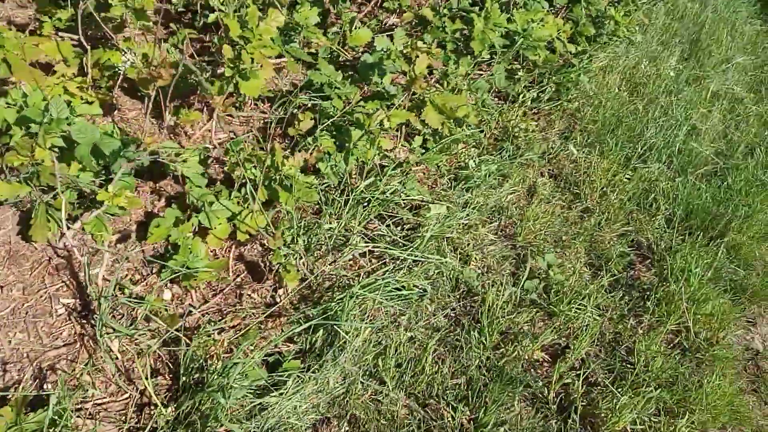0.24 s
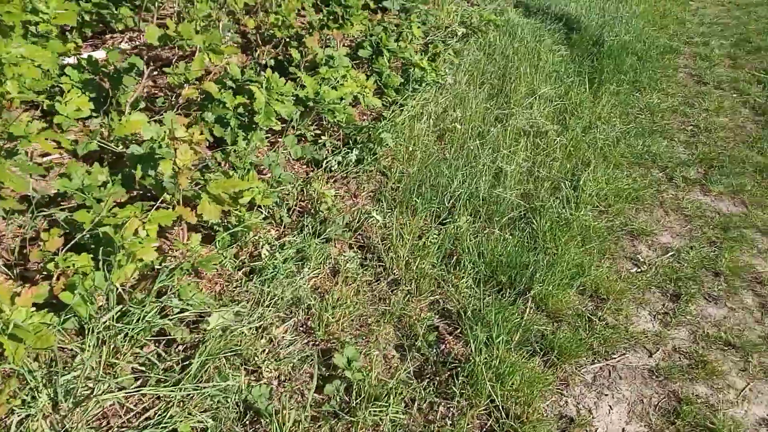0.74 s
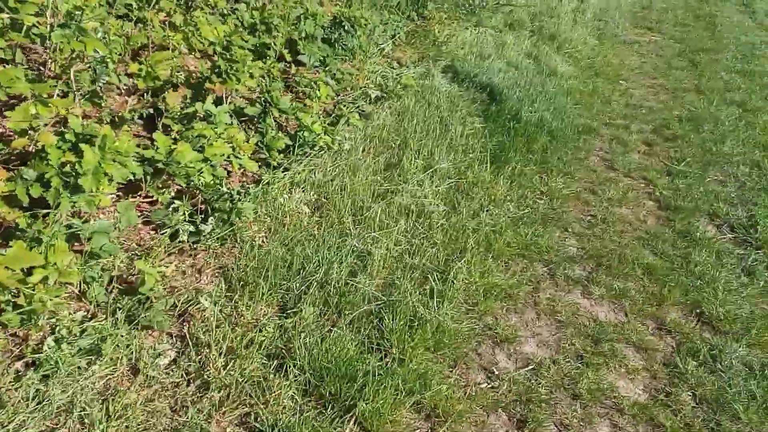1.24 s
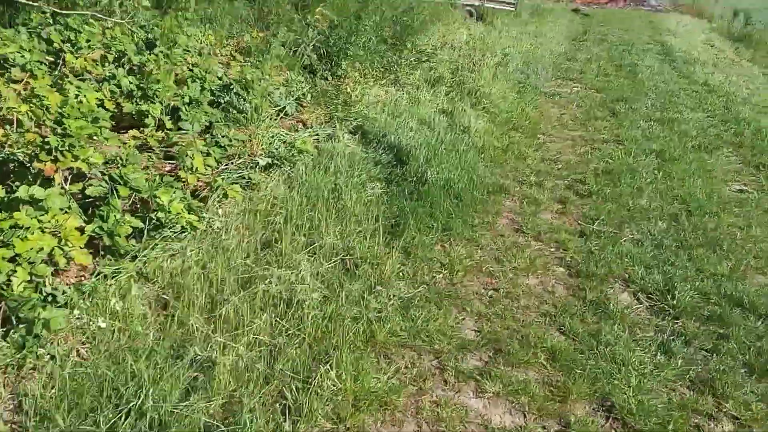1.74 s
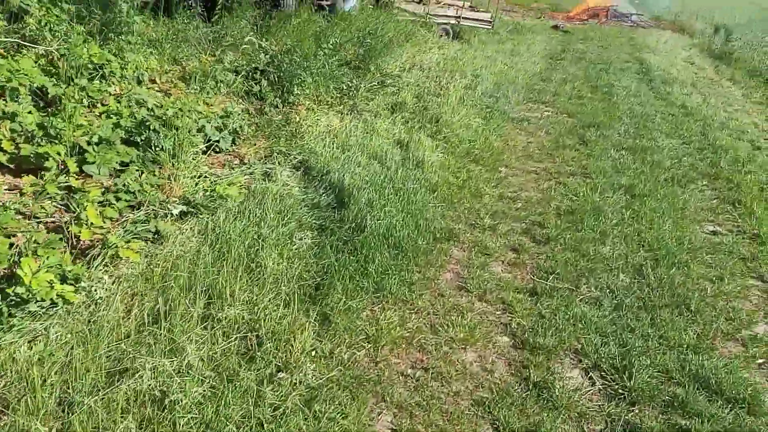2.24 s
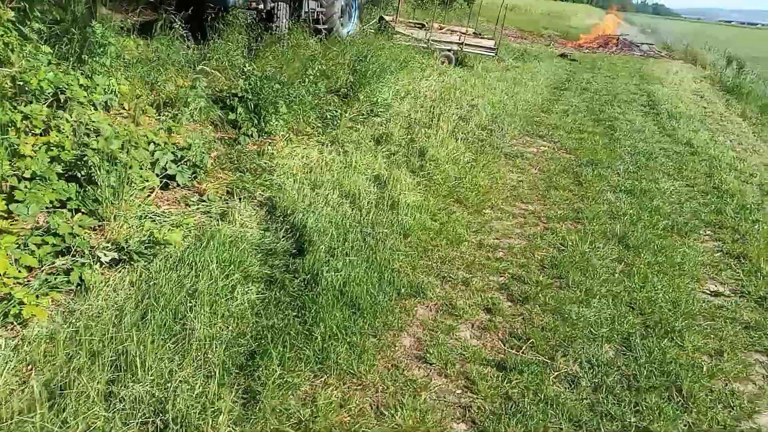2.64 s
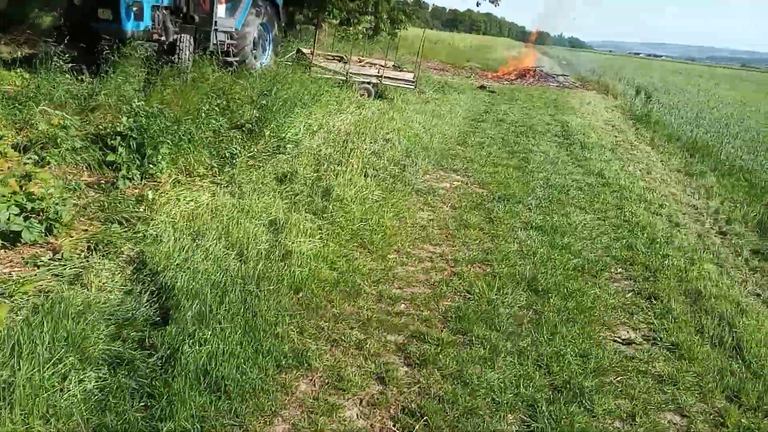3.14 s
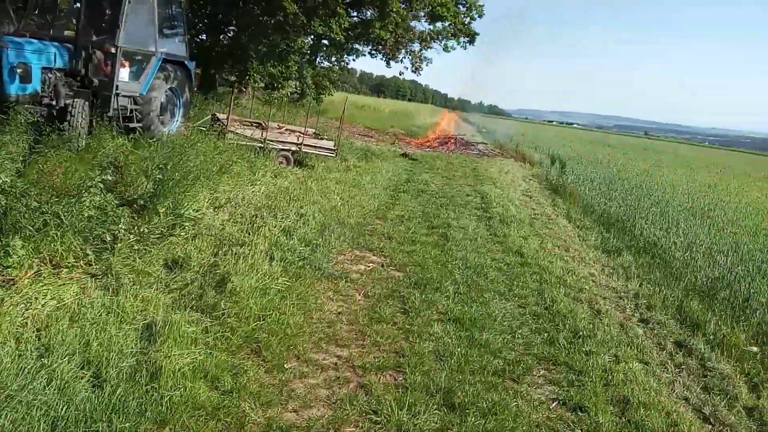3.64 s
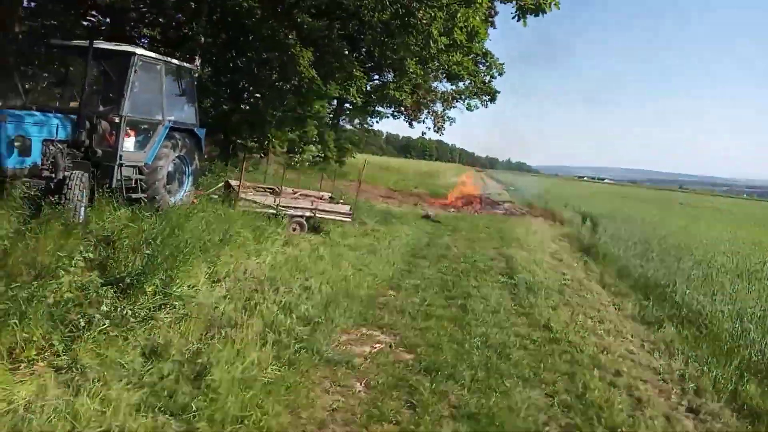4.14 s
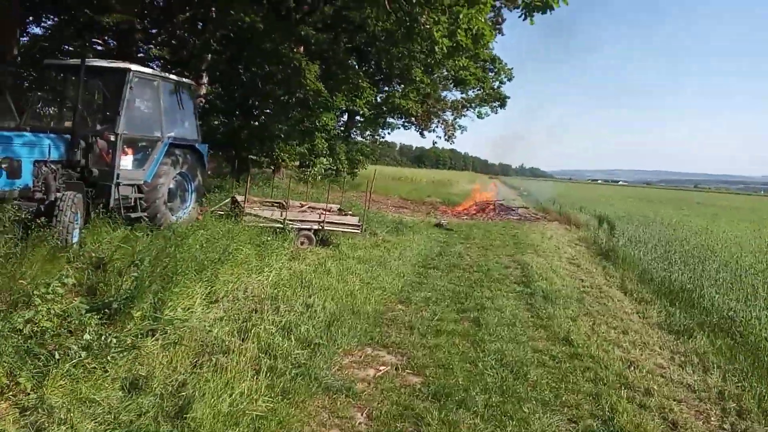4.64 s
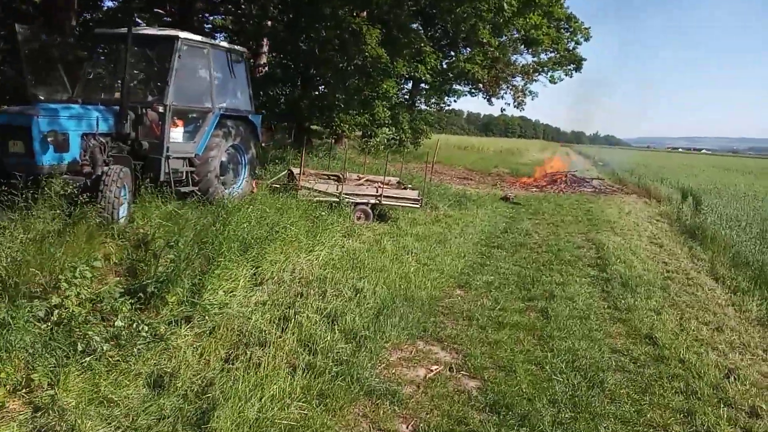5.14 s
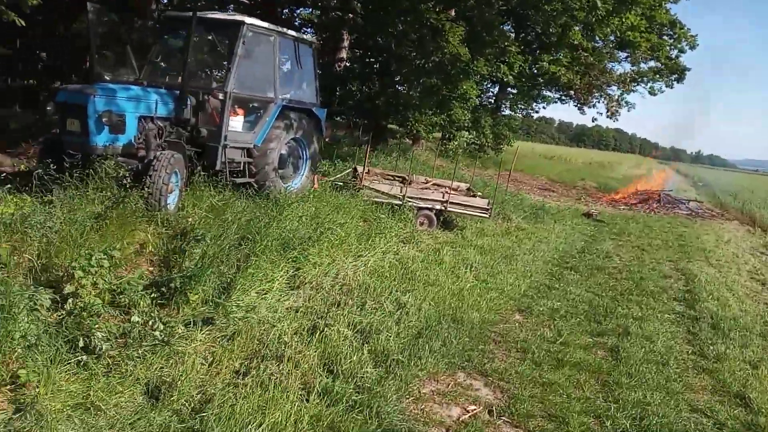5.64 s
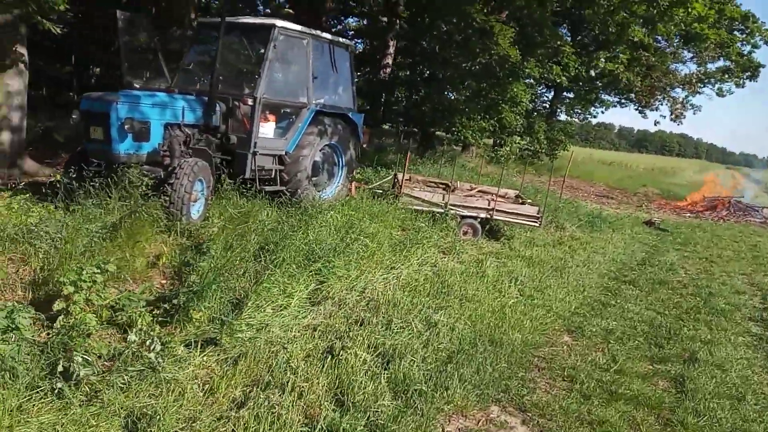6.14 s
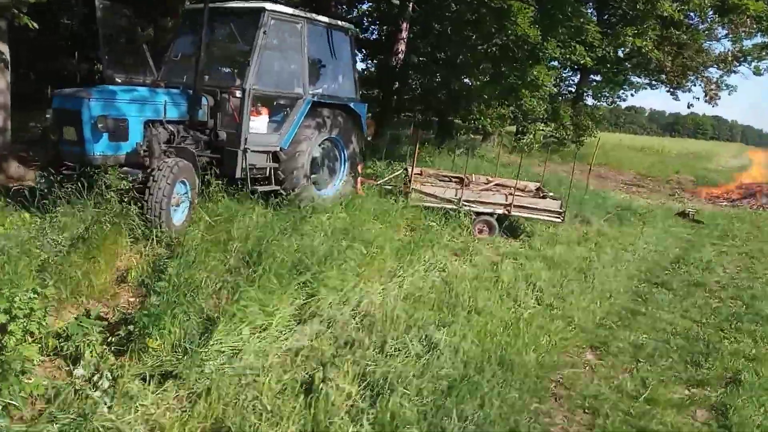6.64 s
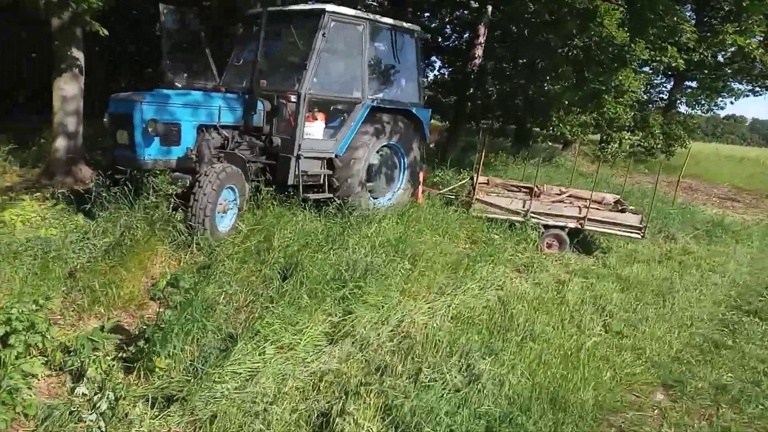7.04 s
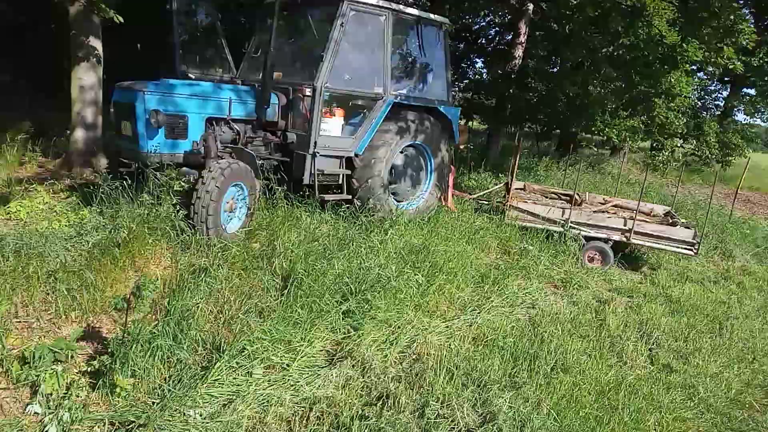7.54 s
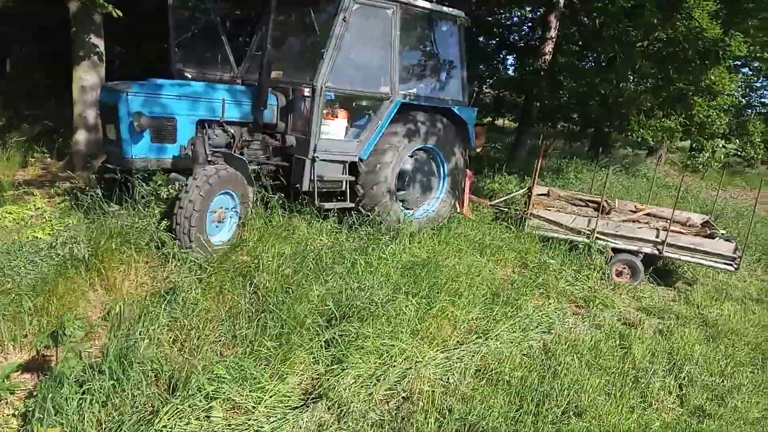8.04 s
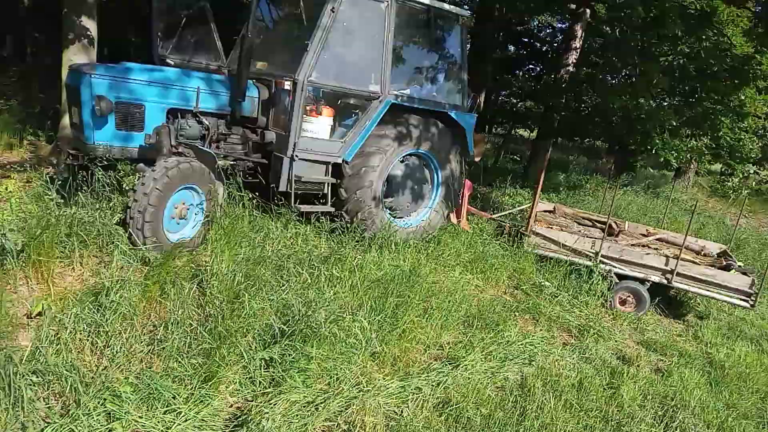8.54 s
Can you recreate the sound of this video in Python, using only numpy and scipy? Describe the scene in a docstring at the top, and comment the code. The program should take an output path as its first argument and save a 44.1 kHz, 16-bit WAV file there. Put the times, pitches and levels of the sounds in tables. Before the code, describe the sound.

A mono, close handheld pickup of a slow walk through long dry grass outdoors. From 0 s, brittle crackling and airy swishes surge every 0.2 to 0.4 s, uneven and overlapping, above a faint steady high hiss. Bright millisecond snaps scatter throughout, strong near 1.2 s. A very faint low hum lies between 0.4 and 1.6 s; distant falling bird whistles come near 1.1, 1.9 and 2.9 s, with a tiny high peep at 1.6 s. Small knocks touch the microphone at 2.7 and 2.9 s. The loudest woody crack hits at 4.3 s with a brief duller wash from trees; others follow at 5.4 and 6.4 s. Low wind puffs and soft thumps cluster around 4.7 to 5.2 s, with gusts until about 7.7 s. Swishing grows brighter and denser, with a strong sweep at 8 s and sharp snaps until the end at about 8.8 s.

```python
"""Walk through long dry grass

A slow walk through long grass at the edge of a field, towards a burning heap of brushwood.
Dense random clicks make the swish and crackle of blades; damped rings, clicks and noise bursts make dry snaps.
The sharpest cracks are noise with a slower noise echo from the trees. Shaped noise gives hiss, scuffs and wind.
Damped thumps are knocks and puffs on a small, peaky microphone; gliding tones are a far bird; a low tone hums."""
import sys
import numpy as np
from scipy import signal
from scipy.fft import rfft, irfft
from scipy.io import wavfile
from scipy.ndimage import uniform_filter1d

SR = 44100
rng = np.random.default_rng(int(sys.argv[2]) if len(sys.argv) > 2 else 0)


def unload_audio(sound):
    """Save the sound as a 16-bit wav file, at the path given as the first command line argument."""
    columns = np.transpose(np.atleast_2d(sound))
    # keep every value between -1 and 1, then stretch to whole-number steps
    steps = np.round(np.clip(columns, -1, 1) * 32767)
    wavfile.write(sys.argv[1], SR, steps.astype(np.int16))


N = 387198

# Levels in the event tables are nominal: trims in the functions and filters still act on them.
# A leg sweeps through the grass or a foot presses it down:
# crest_s, crackle_db, length_s, swish_re_crackle_db
LEG_SWEEPS = [(0.0, -52.5, 0.069, -7), (0.19, -50, 0.056, -12), (0.29, -54, 0.067, -21),
              (0.583, -58, .04, -21.5), (0.989, -51.5, .09, -13.5), (1.363, -56.5, 0.11, -31),
              (1.664, -56, 0.067, -21), (1.816, -55.5, 0.09, -20.5), (2.172, -51, 0.075, -6),
              (2.492, -49.5, 0.11, -7.5), (2.702, -55, 0.1, -15.5), (2.885, -54.5, .1, -10),
              (3.237, -56, 0.12, -14.5), (3.574, -57, 0.17, -4), (3.771, -54, .05, -10),
              (3.933, -51.5, .06, -7), (4.056, -50.5, 0.12, -13), (4.372, -50.5, 0.11, -9),
              (4.575, -58.5, 0.089, 1), (4.721, -53.5, 0.15, -10.5), (4.906, -51, 0.043, -18),
              (5.17, -51.5, 0.18, -6.5), (5.342, -50, 0.099, -2.5), (5.541, -53.5, .05, -19.5),
              (5.71, -55.5, .08, -7.5), (5.88, -53, 0.16, -3), (6.195, -51.5, 0.12, -10.5),
              (6.504, -50.5, 0.14, -11), (6.705, -54, 0.085, -3), (6.885, -52.5, 0.045, -3.5),
              (7.093, -54.5, 0.15, -15), (7.312, -49.5, 0.065, -9.5), (7.448, -54, 0.11, -18),
              (7.722, -54, 0.05, -19.5), (8.001, -47, 0.11, -6.5), (8.232, -50.5, 0.14, -3),
              (8.492, -57.5, .12, -9), (8.697, -49.5, 0.11, -10)]
SWEEP_RISE = 0.98  # build-up of a sweep, as a share of its length
# Grass brushing the legs between sweeps, a curve in time: time_s, crackle_db, swish_db
LEG_BRUSHING = [(0, -58.5, -81), (0.782, -70, -63), (1.099, -58.5, -70), (2.298, -59, -72.5),
                (3.379, -65, -69.5), (3.699, -59.5, -63.5), (4.601, -59, -59), (5.001, -64.5, -70),
                (5.199, -56.5, -64.5), (7.6, -57, -60), (8.1, -54, -59), (8.78, -53, -60)]
# Louder dry snaps, from the burning brushwood or underfoot: start_s, peak_db, pitch_hz, treble_re_peak_db
DRY_SNAPS = [(0.2503, -27.5, 6000, -21.5), (0.2578, -36.5, 6640, -20.5), (0.336, -33.5, 5900, -17),
             (0.4129, -24.5, 6370, -24), (0.5631, -30.5, 6600, -19), (0.6856, -27.5, 6800, -34),
             (0.7067, -39, 6310, -22), (0.9602, -33, 6700, -24), (1.079, -30.5, 6970, -21.5),
             (1.1604, -34, 6530, -29), (1.185, -22.5, 6200, -38), (1.2059, -19.5, 6520, -32.5),
             (1.3154, -32, 5500, -14), (1.495, -35, 6370, -29.5), (1.5766, -30, 5310, -14.5),
             (1.733, -28.5, 5950, -22), (1.8073, -23, 6200, -31.5), (1.836, -32, 5150, -27),
             (1.9674, -29, 5940, -20), (2.4883, -26.5, 5900, -21.5), (2.6103, -26, 6070, -21),
             (2.6798, -32, 6100, -22.5), (2.8136, -39.5, 6290, -17), (2.8958, -30, 6160, -26),
             (2.9213, -28, 6700, -34.5), (3.1462, -30, 6900, -29), (3.1584, -27, 6130, -29),
             (3.3977, -31.5, 6610, -39), (3.6469, -25, 6500, -22), (3.6725, -26.5, 6670, -33),
             (3.7123, -30.5, 6520, -36), (3.8681, -29, 6500, -25), (3.964, -21.5, 6520, -37.5),
             (4.02, -32.5, 6070, -26.5), (4.2187, -23.5, 6570, -31), (4.2941, -14.5, 6520, -24),
             (4.573, -28.5, 6500, -20.5), (4.7182, -32, 6820, -18), (4.7714, -28, 6680, -14.5),
             (4.8783, -27.5, 6470, -18), (5.0767, -26, 6500, -33.5), (5.3188, -27.5, 6370, -10),
             (5.33, -25, 6600, -29), (5.4104, -19, 6590, -20.5), (5.586, -29, 6460, -19.5),
             (5.6156, -18, 5860, -25), (5.661, -28, 6160, -18), (5.668, -33.5, 6730, -9),
             (5.6986, -33, 6360, -14), (5.717, -27, 6120, -18), (5.899, -23.5, 6580, -21.5),
             (6.11, -29, 6520, -35), (6.1433, -27.5, 6430, -22.5), (6.1939, -22, 7270, -27.5),
             (6.3723, -21, 7260, -15), (6.7109, -30.5, 7140, -17), (6.9167, -30.5, 5960, -15.5),
             (7.0551, -34.5, 6650, -10), (7.324, -27, 6820, -13.5), (7.5549, -31, 6570, -19),
             (7.67, -34, 6400, -13), (7.7136, -35.5, 6730, -11.5), (7.8577, -23.5, 6810, -20),
             (7.93, -27, 6400, -16), (8.0188, -23.5, 6540, -24), (8.1877, -26.5, 6710, -12),
             (8.252, -27.5, 7150, -16), (8.377, -23, 6540, -30.5), (8.527, -21, 6550, -10),
             (8.5805, -21.5, 6800, -12), (8.7138, -29, 5740, -5)]
# Thicker wood cracking, with an echo from the trees: start_s, report_db, echo_db
WOOD_CRACKS = [(0.413, -44, -48.5), (1.208, -44, -55.5), (1.808, -46, -54), (3.1456, -42, -46),
               (3.647, -49, -49), (3.949, -43, -55.5), (4.2935, -27, -33.5), (5.4113, -37, -58.5),
               (5.616, -55, -45), (5.9, -41, -44.5), (6.1946, -50.5, -51), (6.372, -32.5, -43.5),
               (6.854, -45, -45.5), (7.858, -39, -49.5), (8.235, -39, -57), (8.579, -41.5, -53.5)]
# Dull scuffs of shoes and clothing: crest_s, rms_db, centre_hz, width_octaves, length_s
SHOE_SCUFFS = [(0.225, -68.5, 286.5, 0.54, 0.047), (0.64, -61, 1510, 0.24, 0.016),
               (0.651, -56.5, 2830, 0.41, 0.0053), (0.848, -54, 1670, 0.26, 0.0058),
               (0.847, -48.5, 3410, 0.29, .005), (0.899, -64.5, 1430, 0.32, 0.067),
               (1.008, -59, 1230, .55, 0.017), (1.247, -71.5, 509, 0.55, 0.035),
               (1.726, -71.5, 850, 1.3, 0.046), (2.484, -74, 1395, 0.63, 0.086),
               (2.547, -66.5, 661, 0.55, 0.026), (2.705, -63.5, 510, 0.58, 0.043),
               (3.215, -68, 1436, .35, 0.1), (4.336, -68.5, 1058, 0.52, 0.041),
               (5.105, -67.5, 1780, 0.76, 0.033), (5.368, -66.5, 1026, 0.64, 0.026),
               (5.415, -49, 990, 0.73, 0.0048), (5.503, -68.5, 980, 1.3, 0.046),
               (6.198, -69, 1136, 0.39, .053), (6.429, -69.5, 1252, 0.93, 0.052),
               (7.71, -64, 265, 0.44, 0.025), (8.049, -69, 1610, 1.46, 0.14), (8.255, -68, 2070, 1, 0.15),
               (8.689, -42, 1063, 1.2, 0.003), (8.73, -60, 902, 1.65, 0.065)]
# Knocks of the hand and puffs of air on the microphone: crest_s, peak_db, pitch_hz, crispness (0-1)
MIC_KNOCKS = [(2.716, -39, 480, .4), (2.721, -31.5, 370, .45), (2.8615, -39, 440, .4),
              (2.866, -46, 460, .3), (4.960, -38, 240, 0), (4.976, -30, 115, 0), (4.988, -25, 160, 0),
              (5.073, -32, 130, 0), (5.1335, -32, 370, 0), (5.1365, -22.5, 205, 0), (5.160, -37, 140, 0)]
# Bird whistles: start_s, length_s, start_hz, end_hz, level_db
BIRD_WHISTLES = [(1.14, .31, 2780, 2450, -74), (1.61, .08, 9250, 9150, -62.5), (1.94, .28, 2850, 2620, -73),
                 (2.87, .25, 2780, 2440, -71)]
# Gusts on the microphone: crest_s, level_db, length_s
WIND_GUSTS = [(0.0, -53.5, 0.083), (0.22, -50.5, 0.12), (0.8, -73.5, 0.31), (1.71, -66.5, 0.041),
              (1.85, -76, 0.14), (3.16, -66, 0.048), (3.49, -67, 0.13), (4.0, -66, .05),
              (4.17, -65.5, 0.059), (4.26, -56.5, 0.019), (4.67, -52, 0.079), (4.83, -44, 0.021),
              (4.91, -46, 0.065), (4.98, -39, 0.056), (5.12, -45, 0.059), (5.3, -50.5, 0.12),
              (5.49, -50, 0.037), (5.65, -57.5, 0.026), (5.81, -54.5, 0.066), (5.99, -42.5, 0.04),
              (6.27, -55.5, 0.091), (6.5, -45, 0.083), (6.68, -45.5, .03), (6.83, -57.5, 0.11),
              (7.35, -65, 0.13), (7.51, -47.5, 0.035), (7.68, -52, 0.16), (7.94, -63.5, 0.14),
              (8.2, -73.5, 0.055)]
BREEZE_DB, GUST_RISE = -82, 0.85  # wind between gusts; build-up of a gust, as a share of its length
# Stretches of a brief low hum: start_s, end_s, level_db
HUM_STRETCHES = [(.38, 1.176, -62), (1.23, 1.614, -64.5)]
HUM_FADE_S = 0.051
HISS_DB = -61.5

# Relative spectra, only their shape matters: frequency_hz, density_db (per Hz)
# Stalks crackling as they bend
CRACKLE_SPECTRUM = [(300, -37.5), (900, -42), (1400, -11.5), (2100, -28), (3000, -8.5), (3800, -14.5),
                    (4500, -5), (5600, -4), (6800, 0), (8000, -13), (10000, -9), (12000, -18.5),
                    (16000, -25)]
# Blades sliding over each other, also used for the bright noise burst of a snap
SWISH_SPECTRUM = [(500, -42.5), (2500, -42), (5000, -9), (8000, 0), (9700, 1.5), (10700, -3), (11800, 2),
                  (13500, -3), (16000, -12.5)]
# The click of a snap and its short noise tail
CLICK_SPECTRUM = [(300, -29), (900, -46), (1500, -21.5), (2200, -27), (3000, -12.5), (4200, -2), (6000, 3),
                  (8000, -8), (10000, -1.5), (16000, -42.5)]
# The sharp report of a crack
REPORT_SPECTRUM = [(200, -57), (400, 1), (700, -30), (1100, -22), (1500, -10), (2100, -10), (3200, -4.5),
                   (4500, 6.5), (6200, 1.5), (8000, -8), (11000, -1.5), (16000, -9)]
# Its wash returned by the trees
ECHO_SPECTRUM = [(300, -28), (900, -17), (1400, -19), (2100, -15), (3000, -14), (3800, -12), (4600, -9),
                 (6200, 0), (8000, -7), (11000, -13), (16000, -25)]
# The high background hiss
HISS_SPECTRUM = [(60, -17), (200, -10), (500, -15.5), (1000, -22), (2300, -26.5), (3000, -18.5),
                 (3800, -12), (4700, -2.5), (6500, -2.5), (8000, -17), (10500, -28.5), (13000, -44),
                 (16000, -22.5)]
# Wind on the microphone
GUST_SPECTRUM = [(20, -30.5), (40, -3.5), (70, 6), (100, 7.5), (180, -5.5), (270, -26), (400, -39),
                 (800, -52), (2000, -84)]

# Resonances of the microphone port: centre_hz, width_hz, lift_db
PORT_PEAKS = [(1586, 150, 22.5), (3300, 224, 11.5), (6500, 1420, 10)]
# One dip of the port, a single row: centre_hz, width_hz, lift_db
PORT_NOTCH = (1894, 880, -12.5)
CUTOFF_HZ = 15900


def grass(crackle_trim_db=-2.0, swish_trim_db=-0.5, tick_db=-6.0, patchy_db=2.0, swish_patchy_db=2.0):
    """Granular friction: bending stalks crackle and tick, sliding blades swish brighter, in uneven tufts."""
    crackle, swish = rustle_levels()
    tufts = drift(24)
    ticks = from_db(tick_db) * grains(per_s=70, spread_db=5.0)
    stalk_gain = crackle * from_db(crackle_trim_db + patchy_db * tufts)
    blade_gain = swish * from_db(swish_trim_db + swish_patchy_db * tufts)
    stalks = (grains(per_s=3000, spread_db=3.0) + ticks) * stalk_gain
    blades = (grains(per_s=4100, spread_db=2.5) + ticks) * blade_gain
    return through_port(stalks, CRACKLE_SPECTRUM) + through_port(blades, SWISH_SPECTRUM)


def rustle_levels():
    """Superposition of powers: every sweep adds to the brushing, giving gains of crackle and swish."""
    crest_s, crackle_db, length_s, swish_re_crackle_db = np.transpose(LEG_SWEEPS)
    brushing_crackle_db, brushing_swish_db = in_time(LEG_BRUSHING)

    def gain(brushing_db, sweep_db):
        """Amplitude is the square root of the summed power."""
        sweep_power = surges(zip(crest_s, sweep_db, length_s), SWEEP_RISE)
        return np.sqrt(from_db(brushing_db) ** 2 + sweep_power)

    crackle = gain(brushing_crackle_db, crackle_db)
    swish = gain(brushing_swish_db, crackle_db + swish_re_crackle_db)
    return crackle, swish


def snaps(lowest_hz=2800, ring_db=-1.5, burst_db=21.0, click_db=1.5,
          tail_db=-23, tail_s=0.011, click_delay_s=0.0007):
    """Damped resonance: a bright noise burst starts just before a click, a brief ring and a short noise tail."""
    t = np.arange(SR // 20) / SR
    ring_shape = swell(t, 0.00036)
    burst_decay = np.exp(-t / 0.0009)
    rings, bursts, clicks = np.zeros((3, N))
    for start_s, peak_db, pitch_hz, treble_db in list(DRY_SNAPS) + small_snaps():
        burst = burst_decay * rng.standard_normal(len(t))
        burst /= np.linalg.norm(burst)
        add(bursts, start_s, from_db(peak_db + treble_db + burst_db) * burst)
        click_at_s = start_s + click_delay_s
        ring = ring_shape * np.cos(2 * np.pi * (pitch_hz * t + rng.random()))
        add(rings, click_at_s, from_db(peak_db + ring_db) * ring)
        add(clicks, click_at_s, from_db([peak_db + click_db]))
        tail = np.exp(-t / tail_s) * rng.standard_normal(len(t))
        add(clicks, click_at_s, from_db(peak_db + tail_db) * tail)
    burst_sound = through_port(bursts, SWISH_SPECTRUM)
    return band(rings, lowest_hz, 22000) + burst_sound + through_port(clicks, CLICK_SPECTRUM)


def small_snaps(count=84, peak_db=19.0, pitch_hz=6400, spread_hz=450, treble_db=-18.0, treble_spread_db=3.0):
    """Random sampling: small dry snaps fall more often and louder where the crackle is stronger."""
    crackle, _ = rustle_levels()
    share = np.cumsum(crackle) / crackle.sum()
    # One draw in each equal share of the total crackle
    draws = (np.arange(count) + rng.random(count)) / count
    at = np.searchsorted(share, draws).clip(0, N - 1)
    pitch, treble = rng.standard_normal((2, count))
    levels_db = 20 * np.log10(crackle[at]) + peak_db
    pitches_hz = pitch_hz + spread_hz * pitch
    trebles_db = treble_db + treble_spread_db * treble
    return list(zip(at / SR, levels_db, pitches_hz, trebles_db))


def cracks(report_s=0.0035, echo_rise_s=0.011, echo_s=0.044):
    """Impulse and reverberation: thick wood gives a short, broad report; trees return a duller wash."""
    t = np.arange(SR // 2) / SR
    report_shape = np.exp(-t / report_s)
    echo_shape = (1 - np.exp(-t / echo_rise_s)) * np.exp(-t / echo_s)
    reports, echoes = np.zeros((2, N))
    for start_s, report_db, echo_db in WOOD_CRACKS:
        add(reports, start_s, from_db(report_db) * report_shape)
        add(echoes, start_s, from_db(echo_db) * echo_shape)
    report_sound = through_port(reports * rng.standard_normal(N), REPORT_SPECTRUM)
    echo_sound = through_port(echoes * rng.standard_normal(N), ECHO_SPECTRUM)
    return report_sound + echo_sound


def scuffs():
    """Dry friction: each short rub is a swell of noise in one resonance."""
    out = np.zeros(N)
    t = np.arange(SR // 2) / SR
    middle_s = t.mean()
    for crest_s, rms_db, centre_hz, width_octaves, length_s in SHOE_SCUFFS:
        half_width = 2 ** (width_octaves / 2)
        noise = rng.standard_normal(len(t))
        rub = rms_one(band(noise, centre_hz / half_width, centre_hz * half_width))
        envelope = np.exp(-2 * ((t - middle_s) / length_s) ** 2)
        add(out, crest_s - middle_s, from_db(rms_db) * rub * envelope)
    return out


def knocks(width_cycles=0.49, tick_s=0.00017):
    """Heavy damping: thumps of little more than one swing; a hard touch sharpens the crest."""
    out = np.zeros(N)
    t = np.arange(SR // 10) / SR
    middle_s = t.mean()
    from_crest = t - middle_s
    tick = np.exp(-(from_crest / tick_s) ** 2)
    for crest_s, peak_db, pitch_hz, crispness in MIC_KNOCKS:
        envelope = np.exp(-(from_crest * pitch_hz / width_cycles) ** 2)
        thump = envelope * np.cos(2 * np.pi * pitch_hz * from_crest)
        add(out, crest_s - middle_s, from_db(peak_db) * (thump + crispness * tick))
    return band(out, 49, 4000)


def bird(blur_hz=70):
    """Multipath fading: falling whistles are smeared by many paths through the trees."""
    out = np.zeros(N)
    low_pass = signal.butter(2, blur_hz, fs=SR, output="sos")
    paths = signal.sosfilt(low_pass, rng.standard_normal((2, N)))
    for start_s, length_s, start_hz, end_hz, level_db in BIRD_WHISTLES:
        size = int(length_s * SR)
        phase = 2 * np.pi * np.cumsum(np.geomspace(start_hz, end_hz, size)) / SR
        # Slow random weights on cosine and sine blur both strength and phase
        in_phase, quadrature = paths[:, int(start_s * SR):][:, :size]
        smeared = in_phase * np.cos(phase) + quadrature * np.sin(phase)
        add(out, start_s, from_db(level_db) * rms_one(np.sqrt(np.hanning(size)) * smeared))
    return out


def wind():
    """Turbulence: low noise is levelled by its running power, then follows breeze and gusts."""
    eddies = coloured(rng.standard_normal(N), impulse(GUST_SPECTRUM))
    power = uniform_filter1d(uniform_filter1d(eddies ** 2, size=2000), size=2000)
    level = np.sqrt(from_db(BREEZE_DB) ** 2 + surges(WIND_GUSTS, GUST_RISE))
    return eddies / np.sqrt(power + 1e-6) * level


def low_hum(pitch_hz=118, flutter_db=5.0):
    """Frequency and amplitude modulation: random wander roughens a low tone."""
    phase = 2 * np.pi * np.cumsum(pitch_hz * (1 + 0.0535 * drift(43))) / SR
    tone = rms_one(band(np.sin(phase) * from_db(flutter_db * drift(290)), 91.5, 176))
    t = np.arange(N) / SR
    level = np.zeros(N)
    for start_s, end_s, level_db in HUM_STRETCHES:
        fade = np.clip(np.minimum(t - start_s, end_s - t) / HUM_FADE_S, 0, 1)
        level += from_db(level_db) * fade
    return tone * level


def hiss(flicker_db=2.3):
    """Filtered noise: a sustained high hiss whose level flickers slightly."""
    level = from_db(HISS_DB + flicker_db * drift(45))
    return level * through_port(rng.standard_normal(N), HISS_SPECTRUM)


def grains(per_s, spread_db, bursts_per_s=60, burst_s=0.002):
    """Shot noise: tiny uneven clicks, stronger in bursts that start at once and die away; rms 1."""
    starts = (rng.random(N) < bursts_per_s / SR) * rng.random(N)
    bursts = signal.lfilter([1], [1, -np.exp(-1 / (burst_s * SR))], starts + 1e-18)
    born = rng.random(N) < per_s / SR
    excess_db = spread_db * np.minimum(rng.exponential(1, N), 4)
    sizes = from_db(excess_db) * np.sqrt(0.12 + bursts)
    return rms_one(born * sizes * rng.choice([-1, 1], N))


def surges(events, rise):
    """Addition of power: (crest_s, level_db, length_s) events build up smoothly and die away."""
    t = np.arange(N) / SR
    power = np.zeros(N)
    for crest_s, level_db, length_s in events:
        near = slice(*np.searchsorted(t, [crest_s - 4 * length_s, crest_s + 4 * length_s]))
        u = (t[near] - crest_s) / length_s
        u = np.where(u < 0, u / rise, u)
        power[near] += from_db(level_db) ** 2 * np.exp(-2 * u ** 2)
    return power


def through_port(x, spectrum):
    """Resonance: a source's colour, then the peaks and the dip of the microphone port."""
    response = impulse(spectrum)
    for centre_hz, width_hz, lift_db in PORT_PEAKS + [PORT_NOTCH]:
        middle = -2 * np.cos(2 * np.pi * centre_hz / SR)
        pole = np.pi * width_hz / SR
        zero = pole * from_db(lift_db)
        response = signal.lfilter([1 + zero, middle, 1 - zero], [1 + pole, middle, 1 - pole], response)
    return coloured(x, response)


def coloured(x, response):
    """Convolution: filters without changing the power of white noise."""
    return signal.oaconvolve(x, response / np.sqrt(np.sum(response ** 2)))[:N]


def impulse(spectrum):
    """Minimum phase: the folded cepstrum gives a causal response with the given spectrum."""
    size = 2 ** 13
    hz, db = np.transpose(spectrum)
    grid_hz = np.arange(size // 2 + 1) * SR / size
    log_gain = np.log(from_db(np.interp(np.log(grid_hz + 1), np.log(hz), db)))
    cepstrum = irfft(log_gain)[:size // 2]
    cepstrum[1:] *= 2
    return irfft(np.exp(rfft(cepstrum, size)))[:size // 2]


def band(x, low_hz, high_hz):
    """Band-pass filtering: keeps what lies between two frequencies."""
    sos = signal.butter(2, [low_hz, min(high_hz, 0.45 * SR)], "band", fs=SR, output="sos")
    return signal.sosfilt(sos, x)


def swell(t, rise):
    """Growth and decay: rises to one at the given time, then dies away."""
    return (t / rise * np.exp(1 - t / rise)) ** 2


def drift(rate):
    """Random fluctuation: chance values, rate per second, joined by lines; rms 1."""
    knots = rng.standard_normal(4000)
    return rms_one(np.interp(np.arange(N) / SR * rate, np.arange(len(knots)), knots))


def in_time(rows):
    """Linear interpolation: each column of a curve at every sample."""
    time_s, *columns = np.transpose(rows)
    return [np.interp(np.arange(N) / SR, time_s, column) for column in columns]


def from_db(db):
    """Decibel law: 20 dB is a factor of ten in amplitude."""
    return 10 ** (np.asarray(db) / 20)


def rms_one(x):
    """Normalisation: scales to a root mean square of one."""
    return x / np.sqrt(np.mean(x ** 2) + 1e-20)


def add(out, start_s, sound):
    """Superposition: mixes a sound in at a time."""
    at = int(np.clip(round(start_s * SR), 0, N - 1))
    out[at:at + len(sound)] += sound[:N - at]


def scene():
    """Superposition of all sources, in one channel."""
    foreground = grass() + snaps() + cracks() + scuffs() + knocks()
    background = bird() + wind() + low_hum() + hiss()
    return (foreground + background)[None]


def record(dry):
    """Low-pass filtering: a steep elliptic cut removes the top."""
    sos = signal.ellip(10, 0.2, 70, CUTOFF_HZ, fs=SR, output="sos")
    return signal.sosfilt(sos, dry)


dry = scene()
out = record(dry)
unload_audio(out)
```